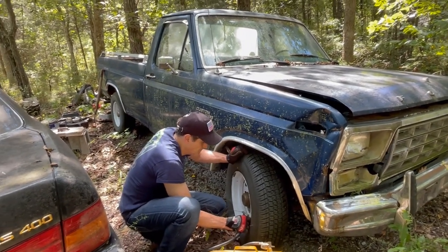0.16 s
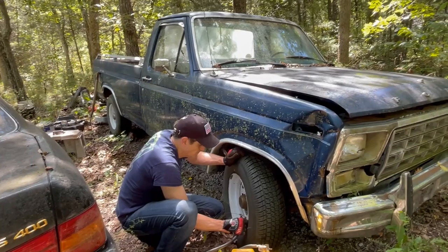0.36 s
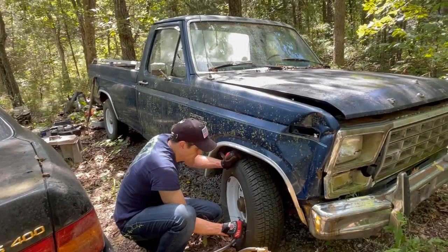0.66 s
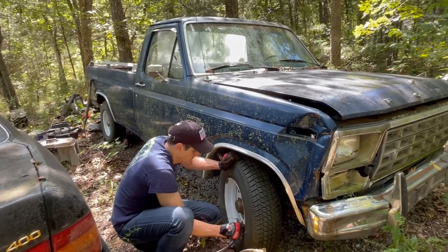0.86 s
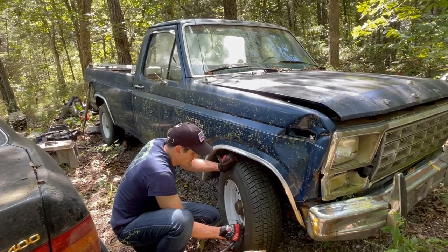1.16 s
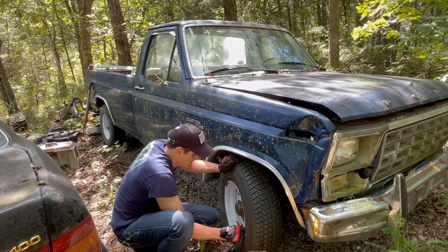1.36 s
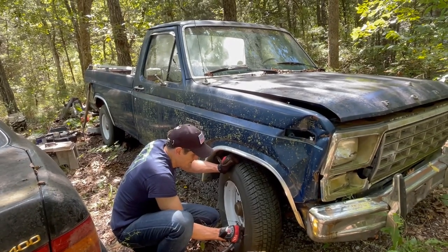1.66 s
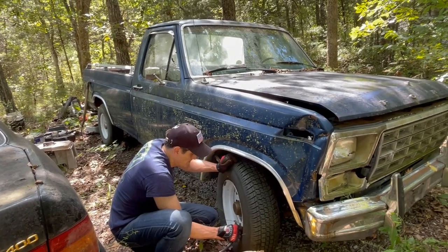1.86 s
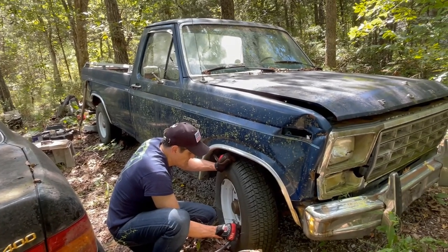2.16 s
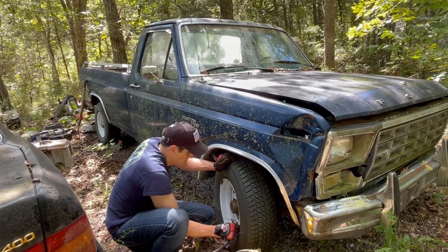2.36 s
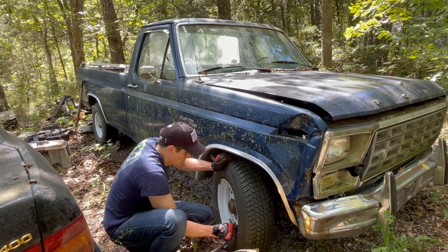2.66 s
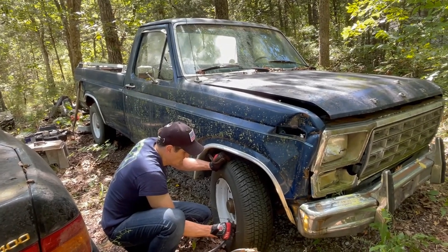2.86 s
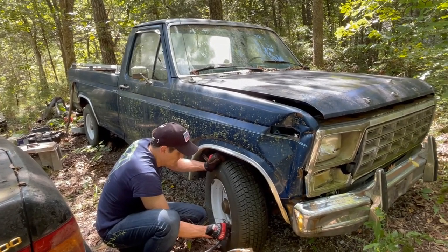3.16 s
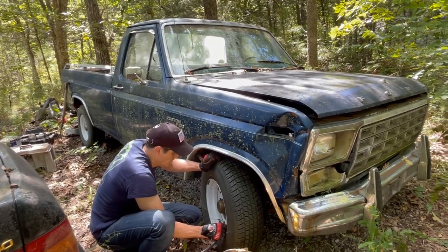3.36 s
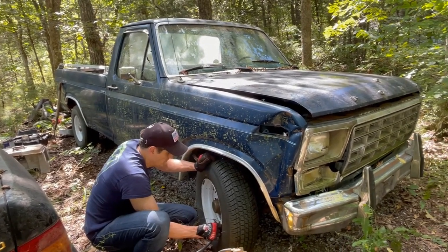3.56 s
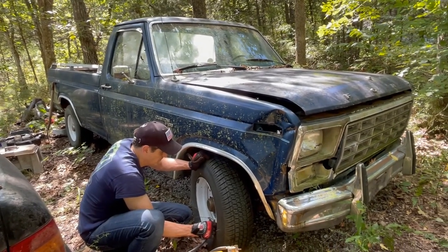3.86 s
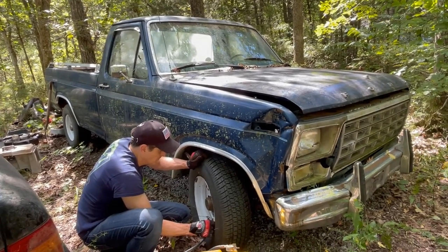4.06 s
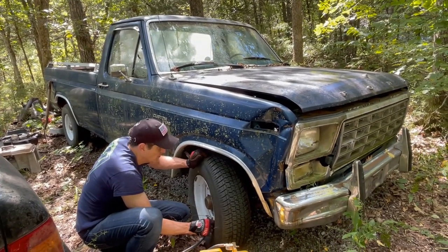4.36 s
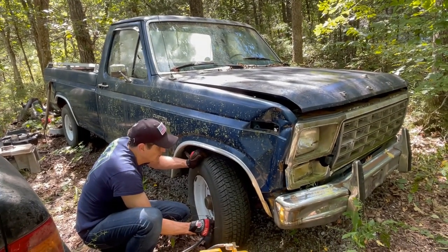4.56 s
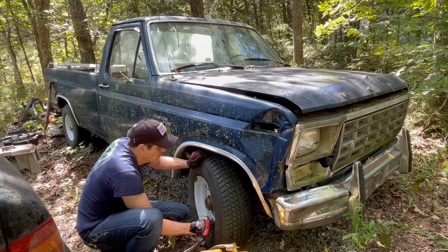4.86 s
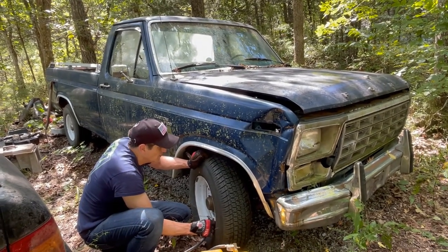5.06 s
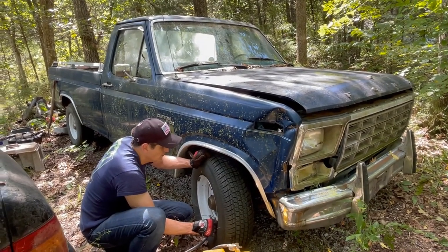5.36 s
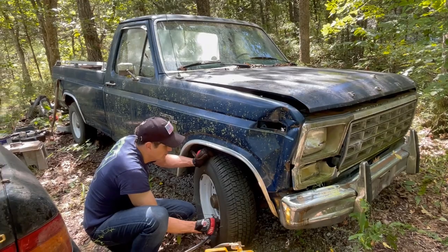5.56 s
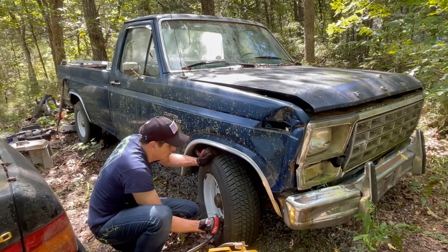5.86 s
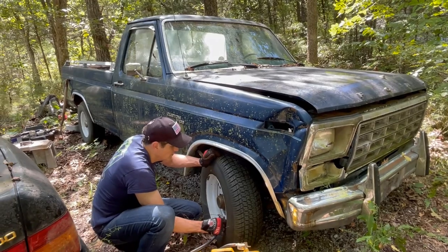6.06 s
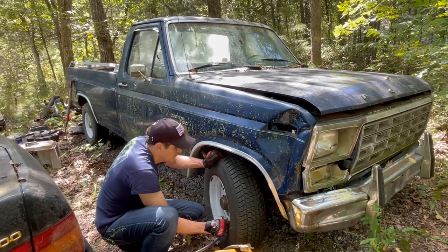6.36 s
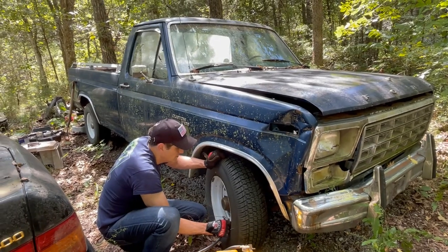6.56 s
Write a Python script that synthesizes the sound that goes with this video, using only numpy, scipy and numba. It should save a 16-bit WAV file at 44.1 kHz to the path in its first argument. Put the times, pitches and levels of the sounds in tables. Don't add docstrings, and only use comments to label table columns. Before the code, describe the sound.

Loud summer cicadas drone and throb all around while compressed air hisses and rings faintly into a truck tyre, distant traffic rumbling below.

```python
import sys
import numpy as np
from scipy import signal
from scipy.fft import rfft, irfft
from scipy.io import wavfile
from scipy.ndimage import uniform_filter1d
from numba import njit

SR = 44100
rng = np.random.default_rng(int(sys.argv[2]) if len(sys.argv) > 2 else 0)


def invert_db(x):
    u = np.asarray(x, float) / 20
    return 10 ** u


def dump_mix(stems):
    frames = np.atleast_2d(stems).T
    limited = np.clip(frames, -1, 1)
    pcm = np.round(limited * 32767).astype(np.int16)
    wavfile.write(sys.argv[1], SR, pcm)


N = 296352


def clock():
    return np.arange(N) / SR


def hz_axis():
    return np.arange(N // 2 + 1) * SR / N


def along(table):
    s, *columns = np.transpose(table)
    return [np.interp(clock(), s, column) for column in columns]


def over(table, hz):
    f, value = np.transpose(table)
    return np.interp(np.log(hz + 1), np.log(f), value, left=value[0], right=value[-1])


def unit(x):
    return x / np.sqrt(np.mean(x ** 2))


def bell(hz, centre_hz, width_hz):
    return 1 / np.sqrt(1 + (2 * (hz - centre_hz) / width_hz) ** 2)


def resonances(rows, order):
    return np.sqrt(sum(invert_db(2 * db) * bell(hz_axis(), hz, width) ** order for hz, width, db in rows))


def walk(rate):
    hold = int(SR / rate)
    steps = np.repeat(rng.standard_normal(N // hold + 1), hold)
    return 1.3 * uniform_filter1d(uniform_filter1d(steps, hold), hold)[:N]


def phase(hz):
    return 2 * np.pi * np.cumsum(hz) / SR


def pair(alike, lag_s=0.):
    common, left, right = rfft(rng.standard_normal((3, N)))
    alike = np.clip(alike, 0, 1)
    shared, own = np.sqrt(alike) * common, np.sqrt(1 - alike)
    late = np.exp(-2j * np.pi * hz_axis() * lag_s)
    return np.array([shared * late + own * left, shared + own * right])


def patchy(spectra, low_hz, high_hz, slow_db, quick_db, rate, count):
    place = count * np.log2(hz_axis() + 1)
    out = 0
    for k in np.arange(np.floor(count * np.log2(low_hz)), count * np.log2(high_hz)):
        share = np.cos(np.pi / 2 * np.clip(place - k, -1, 1)) ** 2
        wander_db = slow_db * walk(1.89) + quick_db * walk(rate)
        out = out + invert_db(wander_db) * irfft(spectra * share, N)
    return unit(out)


def sides(lean_db):
    return invert_db(np.array([lean_db, -lean_db]).reshape(2, -1) / 2)


def spells(rows, rest_db, rise_s=None, fall_s=None):
    t, db = clock(), rest_db + np.zeros(N)
    for start, held, top_db, *edges in rows:
        rise, fall = edges or (rise_s, fall_s)
        share = np.minimum(1 + (t - start) / rise, 1 - (t - start - held) / fall)
        db = np.maximum(db, rest_db + np.clip(share, 0, 1) * (top_db - rest_db))
    return db


@njit
def resonate(x, hz, width):
    y, band, low = np.empty(len(x)), 0., 0.
    for i in range(len(x)):
        g, k = np.tan(np.pi * hz[i] / SR), width / hz[i]
        v = (band + g * (x[i] - low)) / (1 + g * (g + k))
        band, low, y[i] = 2 * v - band, low + 2 * g * v, k * v
    return y


# frequency in Hz, level in dB per Hz.
JET_TONE = [(5000, -48), (8000, -40), (9700, -23), (10500, -15), (12000, -14.5), (13200, -14), (14300, -12),
            (14900, -3), (15250, 7.5), (15700, 9), (19000, 6)]
# frequency in Hz, likeness from 0 to 1.
JET_ALIKE = [(8000, .2), (11000, .6), (13000, .5), (14400, .5), (15000, .55), (15300, .7)]
# time in seconds, pitch in Hz.
WHISTLE_PITCH = [(1.8, 8688), (2.15, 8650), (2.55, 8624), (3.05, 8668), (3.9, 8645), (4.2, 8657),
                 (4.75, 8648), (5.5, 8614), (6.1, 8505), (6.72, 8550)]
# start in seconds, length in seconds, left level in dB, right level in dB.
WHISTLES = [
    (1.9, .2, -60, -62),
    (2.15, .66, -53, -54),
    (3, .35, -61, -60),
    (3.45, .45, -58, -57.5),
    (4.05, .5, -55, -60),
    (4.6, .95, -54, -61),
    (5.55, .1, -52, -53),
    (5.66, .24, -70, -59),
    (6.67, .1, -70, -57),
]


def leak():
    jet = pair(over(JET_ALIKE, hz_axis()), lag_s=.000104) * invert_db(over(JET_TONE, hz_axis()))
    hiss = patchy(jet, 7000, 16000, slow_db=0.38, quick_db=0.55, rate=17, count=3) * invert_db(-54)
    left_db = spells([(s, held, left) for s, held, left, right in WHISTLES], -78, rise_s=.05, fall_s=.05)
    right_db = spells([(s, held, right) for s, held, left, right in WHISTLES], -78, rise_s=.05, fall_s=.05)
    waver_db = 1.6 * np.array([walk(24), walk(23.9)]) + 1.2
    turn = phase(along(WHISTLE_PITCH)[0] + 5 * walk(40))
    waves = np.array([np.sin(turn), np.sin(turn + 1.8)])
    return hiss + np.sqrt(2) * waves * invert_db(np.array([left_db, right_db]) + waver_db)


# time in seconds, level in dB, left minus right in dB.
CHORUS_LEVEL = [(0, -38, 0), (1, -36.5, 0.5), (2, -36.5, -0.5), (3, -36, 2), (4, -37.5, 0.5), (5, -38, 1),
                (6, -38, 1.5), (6.72, -39.5, 1.5)]
# frequency in Hz, level in dB per Hz.
CHORUS_TONE = [(1120, -43), (1900, -31), (2040, -16), (2550, -7), (3020, -8), (3600, -2.5), (4290, -5),
               (4800, -1.5), (5890, -0.5), (7620, -4), (8200, -12.5), (8820, -13), (9020, -14.5),
               (10000, -16), (11000, -32), (14300, -29), (22000, -120)]
# frequency in Hz, left minus right in dB.
CHORUS_LEAN = [(2000, -4.5), (3000, -2), (3700, 4.5), (4600, 3.5), (5700, -1), (6600, 13), (7500, 2),
               (8300, 8), (9300, -6), (11000, 0)]
# frequency in Hz, width in Hz, dB above the rest.
CHORUS_BELLS = [(2100, 40, 2), (2712, 30, 4), (3635, 40, 4), (5550, 90, -4), (5670, 60, 4),
                (5830, 350, 2.5), (6030, 50, 2.5), (6300, 350, -3.5), (7420, 50, 4), (9700, 100, 3)]


def chorus():
    hz = hz_axis()
    tone_db = over(CHORUS_TONE, hz) + sum(db * bell(hz, f, width) ** 2 for f, width, db in CHORUS_BELLS)
    level_db, lean_db = along(CHORUS_LEVEL)
    voices = pair(0.14, lag_s=-0.000083) * invert_db(tone_db) * sides(over(CHORUS_LEAN, hz))
    hiss = patchy(voices, 1700, 12000, slow_db=0.98, quick_db=0.89, rate=20, count=3)
    return hiss * invert_db(level_db) * sides(lean_db)


# frequency in Hz, width in Hz, level in dB.
SWELL_BODY = [(3960, 1070, -4.5), (4520, 1440, -4.5), (5435, 850, 1.5), (5520, 220, -10.5), (6230, 890, 0),
              (7000, 750, -2.5), (8360, 740, -11)]
# full from in seconds, held in seconds, top in dB, build-up in seconds, let-down in seconds.
PUMPS = [
    (.12, 0.18, -43.5, 0.24, 0.03),
    (1.55, 0.11, -44, 0.7, 0.15),
    (2.9, 0.078, -45.5, 0.28, 0.39),
    (4.47, 0.38, -45, 0.28, 0.16),
    (5.8, .28, -44.5, 0.19, 0.099),
]
# time in seconds, level in dB.
PUMP_REST = [(0, -51), (.8, -53), (2.1, -48.5), (3.7, -49), (5.2, -51), (6.72, -53)]


def sweller():
    rest_db = along(PUMP_REST)[0]
    level_db = spells(PUMPS, rest_db)
    lean_db = 1 + .5 * (level_db - rest_db)
    beat = np.cumsum(67 + 3 * walk(4)) / SR
    bursts = .8 + np.exp(-(beat % 1) / .35)
    clicks = rfft(irfft(pair(0.17), N) * bursts)
    song = unit(irfft(clicks * resonances(SWELL_BODY, order=4), N))
    return song * invert_db(level_db + 6.5) * sides(lean_db)


def throbber(pace, start, song, sharp, upbeat, glide_hz, width_hz, lean_db):
    turn = 2 * np.pi * start + phase(along(pace)[0])
    level_db, hz = along(song)
    squeeze = np.exp(sharp * (np.cos(turn) - 1))
    squeeze = squeeze + upbeat * np.exp(sharp * (np.cos(turn + 1.8) - 1))
    centre = hz - glide_hz * np.sin(turn)
    noise = irfft(pair(0.065), N)
    buzz = np.array([resonate(resonate(x, centre, width_hz), centre, width_hz) for x in noise])
    return unit(squeeze * buzz) * invert_db(level_db + 0.5 * walk(17.0)) * sides(lean_db)


# time in seconds, throbs a second.
HIGH_PACE = [(0, 11.46), (2.7, 11.46), (3.2, 10.95), (6.72, 10.8)]
# time in seconds, level in dB, body pitch in Hz.
HIGH_SONG = [(0, -60, 5500), (.35, -46, 5660), (1, -45, 5620), (2, -45, 5450), (2.7, -46, 5420),
             (3.2, -43.5, 5350), (3.62, -45, 5520), (3.85, -57, 5500), (6.72, -76, 5570)]


def high_singer():
    return throbber(HIGH_PACE, .11, HIGH_SONG, sharp=5.5, upbeat=.5, glide_hz=300, width_hz=650., lean_db=1)


# time in seconds, throbs a second.
LOW_PACE = [(0, 11), (4.2, 13.1), (5, 11.8), (5.6, 11.9), (6.72, 12.6)]
# time in seconds, level in dB, body pitch in Hz.
LOW_SONG = [(0, -56.5, 2570), (1, -58, 2745), (2, -54, 2690), (2.5, -57, 2830), (3, -60, 2830),
            (4.1, -58.5, 2920), (4.7, -62, 2920), (5.3, -64, 3030), (5.9, -55, 3110), (6.3, -61, 2940),
            (6.72, -56, 3050)]


def low_singer():
    return throbber(LOW_PACE, -.3, LOW_SONG, sharp=2.2, upbeat=.5, glide_hz=-40, width_hz=200., lean_db=-2)


def echoed(x):
    late = np.exp(-2j * np.pi * hz_axis() * .001439)
    return irfft(rfft(x) * (1 - invert_db(-11.5) * late), N)


# frequency in Hz, level in dB per Hz.
WOODS_TONE = [(15, -42), (25, -20), (43, -4), (65, 0.5), (97, -3.5), (212, -12.5), (396, -17.5), (502, -15),
              (750, -23.5), (832, -21.5), (870, -27), (1130, -31), (1910, -120)]
# frequency in Hz, likeness from 0 to 1.
WOODS_ALIKE = [(40, 1), (100, 0.65), (200, 0.2), (400, 0.18), (800, 0.07)]
# start in seconds, length in seconds, dB above the drone.
THUMPS = [(.2, .1, 4), (1.5, 0.064, 8.5), (1.95, 0.033, 6), (2.12, 0.16, 7), (3.88, 0.062, 5),
          (4.12, 0.053, 7), (4.61, 0.11, 4.5), (5.06, .1, 5.5), (5.38, 0.24, 7), (5.74, 0.067, 9),
          (6.02, 0.076, 6), (6.21, .1, 5)]


def woods():
    hz = hz_axis()
    tone_db = over(WOODS_TONE, hz) + 6 * bell(hz, 59, 9.9) ** 2 + 6 * bell(hz, 91.1, 6.5) ** 2
    tone_db = tone_db - 30 * np.clip(np.log2((hz + 1) / 2000), 0, 1)
    air = pair(over(WOODS_ALIKE, hz)) * invert_db(tone_db)
    low = bell(hz, 0, 304) ** 2
    road_db = -69 + 0.18 * clock() + spells(THUMPS, 0, rise_s=0.076, fall_s=.12)
    drone = patchy(air * low, 25, 400, slow_db=0.6, quick_db=3.5, rate=18, count=2)
    leaves = patchy(air * (1 - low), 90, 3000, slow_db=.6, quick_db=1.8, rate=8, count=2)
    return drone * invert_db(road_db) * sides(-4.0) + leaves * invert_db(-66.0) * sides(0.87)


# frequency in Hz, width in Hz, level in dB.
TYRE_RINGS = [(907, 16, -13), (945, 70, -17.5), (990, 80, -15.5), (1090, 150, -20), (1184, 26, -12.5),
              (1228, 45, -19), (1283, 14, -11.5), (1368, 12, -8.5), (1400, 45, -16), (1503, 18, -8),
              (1530, 18, -7), (1560, 24, -13), (1608, 18, -12), (1631, 20, -12), (1710, 60, -15.5),
              (1790, 100, -25), (1878, 30, -11.5), (1930, 50, -19.5)]
# start in seconds, length in seconds, level in dB.
SINGS = [(0.14, 0.184, -67), (0.359, 0.13, -77), (0.521, 1.14, -63.5), (1.838, 0.19, -64),
         (2.083, 0.19, -65), (2.391, 0.034, -68), (2.55, 0.29, -66), (2.983, 0.12, -63.5),
         (3.157, 0.57, -64.5), (3.849, 0.062, -67), (3.943, 0.064, -69), (4.11, 0.17, -61),
         (4.35, 0.076, -67), (4.641, 0.078, -63), (4.788, 0.062, -66), (4.893, 0.038, -69),
         (4.967, 0.102, -67), (5.11, 0.152, -66), (5.292, 0.064, -67), (5.4, 0.032, -68.5),
         (5.474, 0.16, -62.5), (5.711, 0.064, -71), (5.901, 0.072, -66), (6.086, 0.044, -67.5),
         (6.517, 0.16, -68)]


def tyre():
    valve_opens_s, opening_s = 0.041, 0.057
    shut_db = -66.5
    opened = np.clip((clock() - valve_opens_s) / opening_s, 0, 1)
    open_db = -60 - 0.85 * clock()
    flow_db = shut_db + opened * (open_db - shut_db)
    rings = pair(0.64) * resonances(TYRE_RINGS, order=3)
    rush = patchy(rings, 820, 2100, slow_db=.6, quick_db=1.8, rate=7, count=6) * invert_db(flow_db)
    sing_hz = 1511 - 2.8 * clock()
    sing_db = spells(SINGS, -80.5, rise_s=.03, fall_s=0.027) + 2.6 * walk(32) - 3.5
    tone = np.sqrt(2) * np.sin(phase(sing_hz + 5 * walk(30))) * invert_db(sing_db) * opened
    return (rush + tone) * sides(-5.0)


# time in seconds, peak level in dB, pitch in Hz.
KNOCKS = [
    (5.997, -61, 1500),
]


def knocks():
    out, t = np.zeros(N), np.arange(1500) / SR
    for start, db, hz in KNOCKS:
        at = int(start * SR)
        out[at:at + len(t)] += invert_db(db) * np.sin(2 * np.pi * hz * t) * np.exp(-t * np.log(1000) / .025)
    return out * sides(2.5)


def scene():
    near_singers = echoed(sweller() + high_singer())
    return leak() + chorus() + near_singers + low_singer() + woods() + tyre() + knocks()


# lowest frequency in Hz, highest frequency in Hz.
THIN_HZ = [(130, 2250), (9300, 13780)]


def thrift(x):
    hz, s, cells = signal.stft(x, SR, window="cosine", nperseg=2048, noverlap=1024)
    at = np.minimum((s * SR).astype(int), N - 1)
    power = uniform_filter1d(abs(cells) ** 2, size=3, axis=1)
    usual = uniform_filter1d(uniform_filter1d(power, size=61, axis=2), size=15, axis=1)
    whim = uniform_filter1d(rng.standard_normal((len(hz) // 4 + 1, len(s))), size=2, axis=1)
    whim = np.repeat(whim, 4, axis=0)[:len(hz)]
    strict = walk(38)[at]
    bar_db = -3.3 + 4.5 * whim + 2.5 * strict * (hz > 5000)[:, None]
    thinned = sum((hz > low) & (hz < high) for low, high in THIN_HZ)[:, None] > 0
    cells = cells * np.where((power < usual * invert_db(2 * bar_db)) & thinned, .06, 1)
    fold = ((hz > 13780) & (hz < 15150))[:, None] & (strict > -.1)
    cells = cells - fold * cells.mean(axis=0)
    return signal.istft(cells, SR, window="cosine", nperseg=2048, noverlap=1024)[1][:, :N]


def top_cut(x):
    return signal.sosfilt(signal.butter(12, 17010, fs=SR, output="sos"), x)


def record(dry):
    kept = irfft(rfft(thrift(dry)) * (hz_axis() < 15770), N)
    return top_cut(kept)


dry = scene()
out = record(dry)
dump_mix(out)
```